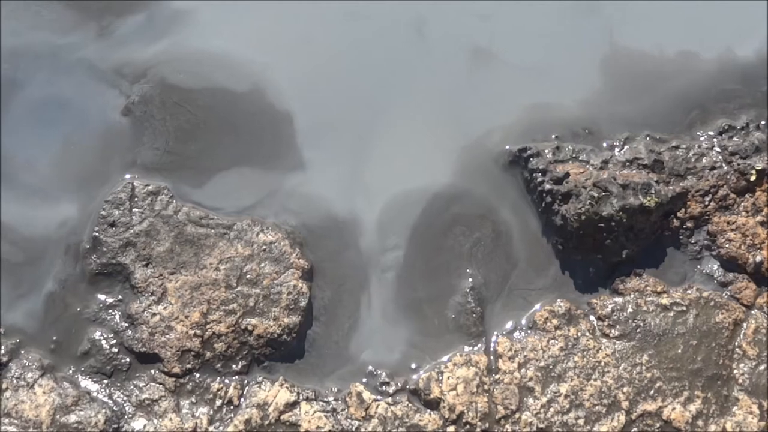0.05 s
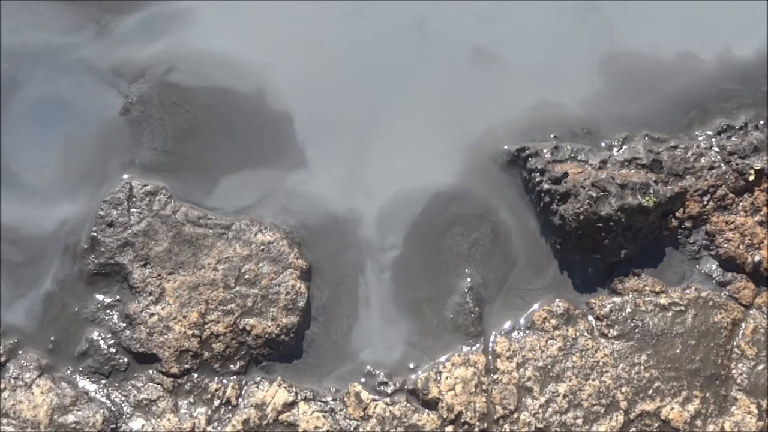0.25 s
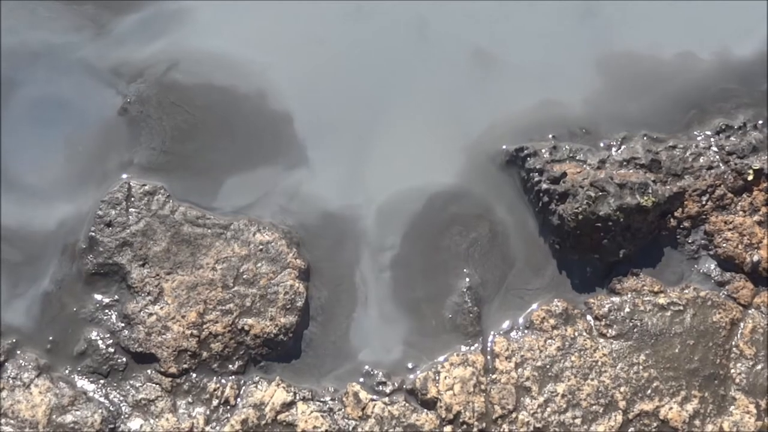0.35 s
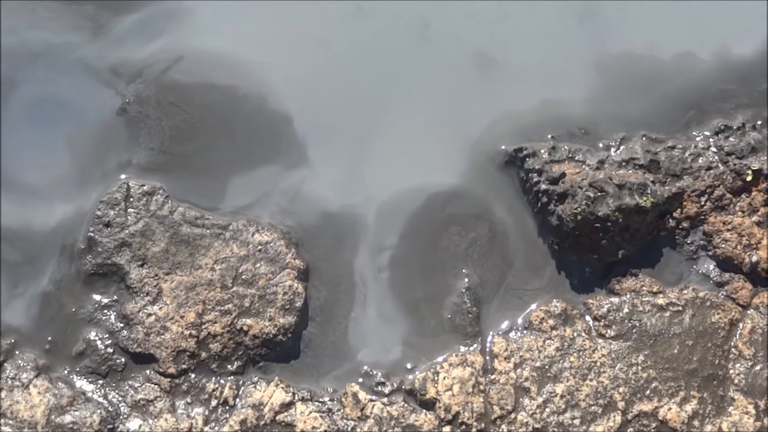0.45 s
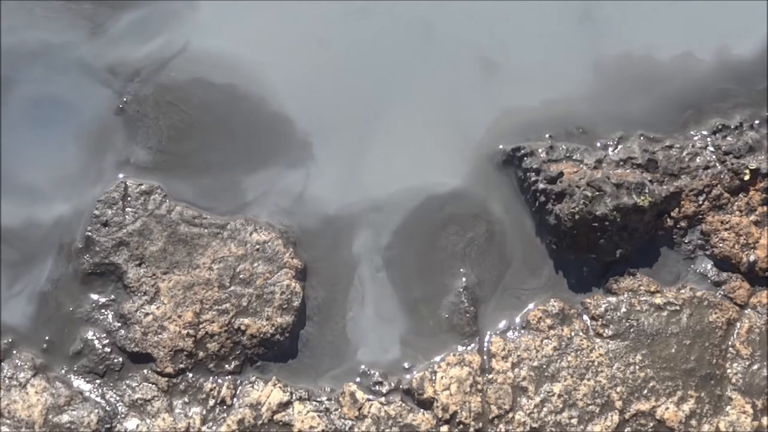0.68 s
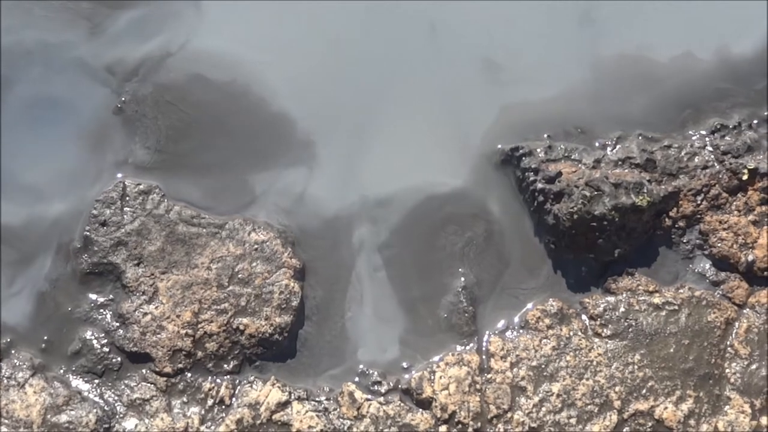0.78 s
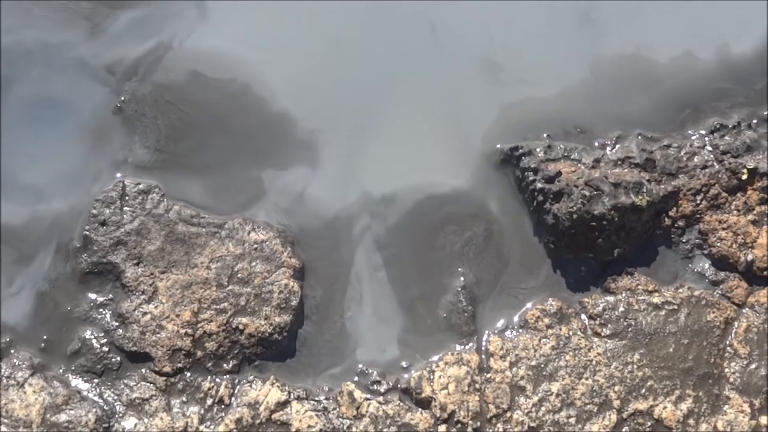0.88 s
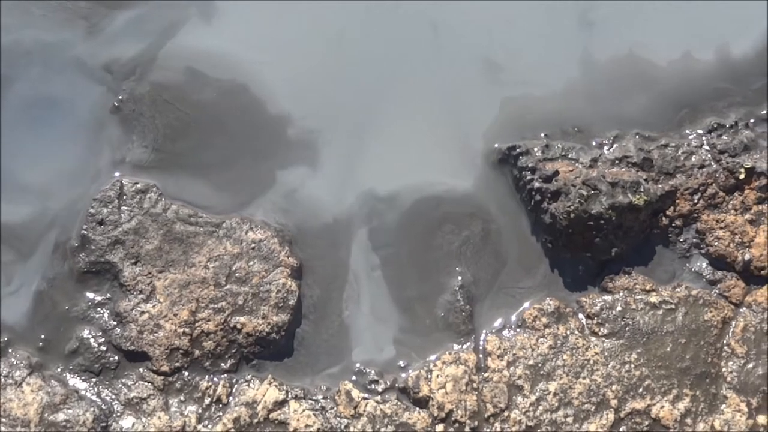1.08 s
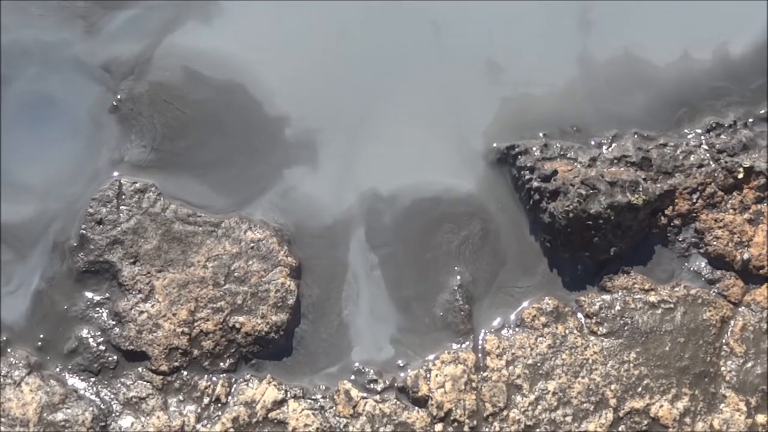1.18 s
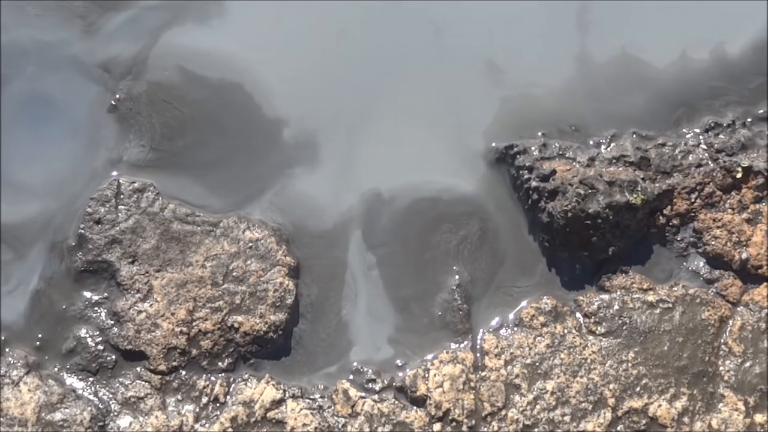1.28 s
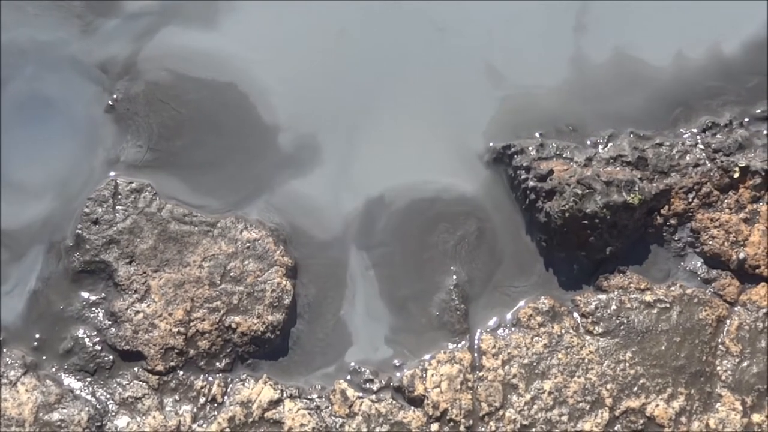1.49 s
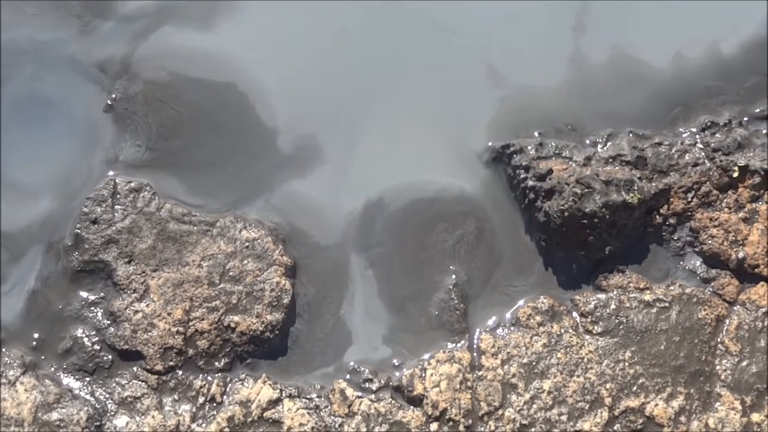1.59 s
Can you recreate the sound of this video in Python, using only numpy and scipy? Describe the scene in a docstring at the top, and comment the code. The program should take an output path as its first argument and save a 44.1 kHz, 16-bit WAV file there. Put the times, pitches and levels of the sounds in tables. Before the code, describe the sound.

Water washes and gurgles among rocks in a muddy outdoor pool throughout, with tiny bubbles fizzing and popping over a bright hiss. A drop ticks at the start. At 0.2 seconds a strong gust buffets the microphone, with a low thump and small plop. Lighter puffs and short thumps follow. Ripples lap softly at 0.7 and 1.5 seconds, with another plop at 1.1 seconds.

```python
"""A hot, muddy pool outdoors. Throughout, water washes and gurgles among the rocks and tiny gas
bubbles fizz and burst at its edge, a few sharply, over a bright hiss. One drop ticks at the start.
At 0.2 s a strong gust buffets the microphone, with a low thump and a small plop. Lighter puffs
follow, short low thumps among them. Ripples lap at 0.7 s, a second plop comes at 1.1 s,
and ripples lap again from 1.5 s."""
import sys
import numpy as np
from scipy import signal
from scipy.fft import rfft, irfft
from scipy.io import wavfile
from scipy.ndimage import uniform_filter1d

SR = 44100
rng = np.random.default_rng(int(sys.argv[2]) if len(sys.argv) > 2 else 0)


def wrap_up_sound(samples):
    """Save the sound to the file named by the first command line argument, as 16-bit audio."""
    columns = np.atleast_2d(samples).T
    # keep every value between -1 and 1, then stretch to whole-number steps
    tamed = np.clip(columns, -1, 1)
    steps = np.round(tamed * 32767).astype(np.int16)
    wavfile.write(sys.argv[1], SR, steps)


N = 72765

# left-right correlation of water noise: freq_hz, correlation
WATER_CORRELATION = [(60, 1), (200, 0.77), (380, 0.13), (700, -0.55), (1200, -0.096), (2200, -0.014),
                     (4400, 0.00053)]


def from_db(db):
    """Decibels to gain."""
    return 10 ** (np.asarray(db) / 20)


def unit_rms(x):
    """Scale to rms 1."""
    return x / np.sqrt(np.mean(x ** 2) + 1e-20)


def in_time(rows):
    """Interpolate (time_s, value) rows at every sample."""
    return np.interp(np.arange(N) / SR, *np.transpose(rows))


def at_hz(rows, hz):
    """Interpolate (freq_hz, value) rows on a log-frequency axis."""
    freq_hz, value = np.transpose(rows)
    return np.interp(np.log(hz + 1), np.log(freq_hz), value)


def drift(rate_hz):
    """Slow random curve, spread near 1."""
    return np.interp(np.arange(N) / SR * rate_hz + rng.random(), np.arange(200), rng.standard_normal(200))


def panned(x, pan_db):
    """Mono to stereo; pan_db is left over right."""
    return x * from_db([[pan_db / 2], [-pan_db / 2]])


def low_cut(x, hz):
    """Second-order high-pass."""
    return signal.sosfilt(signal.butter(2, hz, "high", fs=SR, output="sos"), x)


def stereo_noise(spectrum, correlation):
    """Coloured, partly correlated noise, rolled off above the spectrum's last point; rms 1."""
    hz = np.arange(N + 1) * SR / (2 * N)
    mid, side = rfft(rng.standard_normal((2, 2 * N)))
    alike = np.clip(at_hz(correlation, hz), -.99, .99)
    colour = from_db(at_hz(spectrum, hz)) / np.sqrt(1 + (hz / spectrum[-1][0]) ** 16)
    left_right = np.sqrt(1 + alike) * mid + np.sqrt(1 - alike) * side * [[1], [-1]]
    return unit_rms(irfft(left_right * colour)[:, :N])


def click(start_s):
    """Unit impulse."""
    return 1.0 * (np.arange(N) == int(start_s * SR))


def ring(clicks, hz, t60_s):
    """Resonator: each click starts a decaying sine."""
    radius = from_db(-60 / (t60_s * SR))
    step_rad = 2 * np.pi * hz / SR
    feedback = [1, -2 * radius * np.cos(step_rad), radius * radius]
    return signal.lfilter([0, np.sin(step_rad)], feedback, clicks + 1e-18)


def bubble_cloud(per_s, spread_db, t60_cycles, scatter_db, pitches_hz):
    """Bubbles burst at random, each ringing at one pitch, scattered left and right; rms 1."""
    sizes = from_db(spread_db * np.minimum(rng.exponential(1, N), 3)) * rng.choice([-1, 1], N)
    kicks = sizes * (rng.random(N) < per_s / SR)
    pitch_index = rng.integers(0, len(pitches_hz), N)
    cloud = 0
    for k, hz in enumerate(pitches_hz):
        ringing = ring(kicks * (pitch_index == k), hz, t60_cycles / hz)
        cloud += panned(ringing, scatter_db * rng.random() * (-1) ** k)
    return unit_rms(cloud)


def blips(rows, t60_cycles, rise_cycles):
    """Decaying sines with a rounded attack."""
    total = 0
    for start_s, peak_db, pitch_hz, pan_db in rows:
        cycles = np.maximum(np.arange(N) / SR - start_s, 0) * pitch_hz
        envelope = (1 - np.exp(-(cycles / rise_cycles) ** 2)) * from_db(-60 * cycles / t60_cycles)
        envelope *= from_db(peak_db) / envelope.max()
        total += panned(envelope * np.sin(2 * np.pi * cycles), pan_db)
    return total


def turbulence(spectrum, correlation, window_s=0.019):
    """Low lumpy noise, levelled by its running rms."""
    noise = stereo_noise(spectrum, [(1, correlation), (SR, correlation)])
    power = np.mean(noise ** 2, axis=0)
    width = int(window_s * SR)
    running_power = uniform_filter1d(uniform_filter1d(power, width), width)
    return noise / np.sqrt(running_power + 1e-9)


def whine():
    """Two faint steady tones."""
    # tones: pitch_hz, rms_db
    tones = [(3800, -81), (5950, -79)]
    t = np.arange(N) / SR
    return sum(from_db(db) * np.sqrt(2) * np.sin(2 * np.pi * hz * t) for hz, db in tones)


def hiss(base_db=-56):
    """Smooth bright hiss."""
    # hiss colour: freq_hz, relative_db
    spectrum = [(2000, -20), (4000, 3.5), (6000, 1), (8000, -0.5), (10500, -2), (13500, 0.5), (16000, -4)]
    # left-right correlation: freq_hz, correlation
    correlation = [(3000, 0.12), (5500, 0.46), (8000, 0.79), (15000, 0.94)]
    # slow swell: time_s, gain_db
    swell = [(0, 0.5), (.35, 0.5), (.7, 0), (1.1, 1), (1.4, 0.8), (1.65, -0.5)]
    return from_db(base_db + in_time(swell)) * stereo_noise(spectrum, correlation)


def wash(base_db=-44, waver_db=0.95, waver_hz=7.0, bands=16):
    """Moving water, wide and steady; each band wavers a little by itself."""
    # water colour: freq_hz, relative_db
    spectrum = [(20, -18), (35, -18), (70, -3), (120, -1), (200, -3.5), (290, -3), (380, -5), (540, -4.5),
                (720, -7), (1000, -9), (1400, -12.5), (2000, -17.5), (3200, -21.5), (6500, -41)]
    # slow swell: time_s, gain_db
    swell = [(0, 1.1), (.4, -.5), (.75, 0.2), (1.0, 0.06), (1.4, 0.1), (1.52, 0.7), (1.65, -.5)]
    bins = rfft(stereo_noise(spectrum, WATER_CORRELATION), 2 * N)
    hz = np.arange(N + 1) * SR / (2 * N)
    band_position = at_hz([(120, 0), (4000, bands - 1)], hz)
    water = 0
    for k in range(bands):
        band = irfft(bins * np.maximum(1 - abs(band_position - k), 0))[:, :N]
        water += band * from_db(waver_db * drift(waver_hz))
    return from_db(base_db + in_time(swell)) * water


def laps():
    """Ripples reach the rocks in soft splashy swells."""
    # ripples: centre_s, peak_db, sigma_s
    ripples = [(.74, -53.5, .06), (1.5, -52, 0.029), (1.575, -52.5, 0.019)]
    # splash colour: freq_hz, relative_db
    spectrum = [(400, -28), (800, -5), (1150, 6), (1500, -6), (2500, -30), (4000, -37)]
    t = np.arange(N) / SR
    swell = sum(from_db(db) * np.exp(-.5 * ((t - centre_s) / sigma_s) ** 2)
                for centre_s, db, sigma_s in ripples)
    return swell * stereo_noise(spectrum, WATER_CORRELATION)


def gurgle(rms_db=-57):
    """Larger bubbles ring across the pool."""
    cloud = bubble_cloud(per_s=180, spread_db=2.5, t60_cycles=25, scatter_db=16,
                         pitches_hz=np.geomspace(408, 1630, 20))
    return from_db(rms_db) * cloud


def fizz(base_db=-58):
    """Tiny gas bubbles burst at the water's edge."""
    # slow swell: time_s, gain_db
    swell = [(0, 1), (.4, 1.5), (.9, 0), (1.4, -2.5), (1.65, -0.5)]
    cloud = bubble_cloud(per_s=380, spread_db=4.5, t60_cycles=3.2, scatter_db=1,
                         pitches_hz=np.geomspace(11000, 15800, 12))
    return from_db(base_db + in_time(swell)) * low_cut(cloud, hz=5300)


def drop(start_s=.0106):
    """One drop lands with a small, dull tick."""
    # tick modes: pitch_hz, level_db, t60_s
    modes = [(1170, -35.5, 0.0042), (2100, -29, .006), (2960, -33.5, 0.0034)]
    return sum(from_db(db) * ring(click(start_s), hz, t60_s) for hz, db, t60_s in modes)


def plops():
    """Two small plops in the water."""
    # plops: start_s, peak_db, pitch_hz, pan_db
    events = [(.234, -42, 970, 0), (1.085, -36.5, 920, 5)]
    return blips(events, t60_cycles=14, rise_cycles=0.77)


def bursts(gain_db=4.5, t60_cycles=11.7):
    """The nearest bubbles burst sharply above the fizz."""
    # near bubbles: start_s, relative_db, pitch_hz, pan_db
    bubbles = [(.075, -37, 12500, 0), (.2735, -37, 14500, 4), (0.319, -39, 11500, 1),
               (.3282, -40, 13500, 0), (0.3333, -30.5, 13100, 8), (0.3735, -36, 13200, -2),
               (.3985, -39, 11000, 4), (0.4394, -34, 14500, 4), (0.588, -33, 14000, 5),
               (0.6883, -33, 13300, -1), (.718, -34, 11900, 3), (0.772, -52, 12500, 0),
               (.8283, -36, 11700, 5), (1.171, -35, 8450, 8), (1.2375, -32.5, 11000, -7),
               (1.3543, -30, 14800, -.5), (1.3944, -31, 14600, -2), (1.4323, -34, 14500, 0)]
    ticks = sum(panned(from_db(db + gain_db) * ring(click(start_s), hz, t60_cycles / hz), pan_db)
                for start_s, db, hz, pan_db in bubbles)
    return low_cut(ticks, hz=2300)


def thumps():
    """Short low thumps and glugs."""
    # thumps: start_s, peak_db, pitch_hz, pan_db
    events = [(.229, -25.5, 320, 9), (.229, -31.5, 524, -5), (.469, -32.5, 284, 1), (.559, -32, 169.5, 3),
              (1.259, -30.5, 240, 0), (1.327, -33, 247, -1), (1.459, -34.5, 168, -1)]
    return blips(events, t60_cycles=14.5, rise_cycles=1.5)


def wind(eddy_gain_db=2):
    """Gusts drive a rumble and smaller eddies on the microphone ports."""
    # wind pressure: time_s, level_db
    gusts = [(0, -53), (.15, -55), (.183, -29.5), (.197, -43), (.211, -18.5), (.234, -17.5), (.262, -24.5),
             (.28, -18.5), (.306, -37), (.33, -23.5), (.358, -31.5), (.4, -28), (.464, -36), (.49, -45),
             (.528, -29.5), (.556, -44.5), (.652, -29), (.684, -41.5), (.765, -44.5), (.804, -70),
             (.864, -46), (.946, -59), (1.0, -32.5), (1.024, -42), (1.07, -30), (1.166, -65.5),
             (1.198, -38.5), (1.235, -58), (1.29, -32), (1.322, -44), (1.358, -34), (1.51, -55),
             (1.58, -32.5), (1.65, -47)]
    # rumble colour: freq_hz, relative_db
    rumble_spectrum = [(15, -25), (28, -5.5), (42, 1), (70, 1.5), (115, -0.5), (150, -7.5), (240, -27.5),
                       (400, -38), (800, -69)]
    # eddy strength: time_s, relative_db
    eddy_strength = [(0, -53), (.17, -77), (.215, -24.5), (.242, -27), (.282, -30), (.306, -48),
                     (.34, -26.5), (.366, -47.5), (.42, -38.5), (.505, -62), (.565, -41.5), (.6, -57),
                     (.636, -32.5), (.675, -48.5), (.8, -73), (1.02, -56), (1.08, -52), (1.13, -55),
                     (1.235, -58.5), (1.268, -31), (1.31, -52), (1.42, -65), (1.48, -55), (1.525, -45.5),
                     (1.575, -40.5), (1.61, -45), (1.65, -43)]
    # eddy colour: freq_hz, relative_db
    eddy_spectrum = [(70, -28), (120, -3.5), (165, -1), (230, -4.5), (320, -17.5), (520, -30), (720, -34.5),
                     (1500, -48)]
    rumble = from_db(in_time(gusts)) * turbulence(rumble_spectrum, correlation=.88)
    eddies = from_db(in_time(eddy_strength) + eddy_gain_db) * turbulence(eddy_spectrum, correlation=.34)
    return rumble + eddies


def scene():
    """Wind and pool, stereo."""
    return (wind() + thumps() + wash() + laps() + gurgle() + plops()
            + fizz() + bursts() + drop() + hiss() + whine())


def record(dry, cutoff_hz=15900):
    """Steep elliptic low-pass."""
    return signal.sosfilt(signal.ellip(10, .2, 80, cutoff_hz, fs=SR, output="sos"), dry)


dry = scene()
out = record(dry)
wrap_up_sound(out)
```